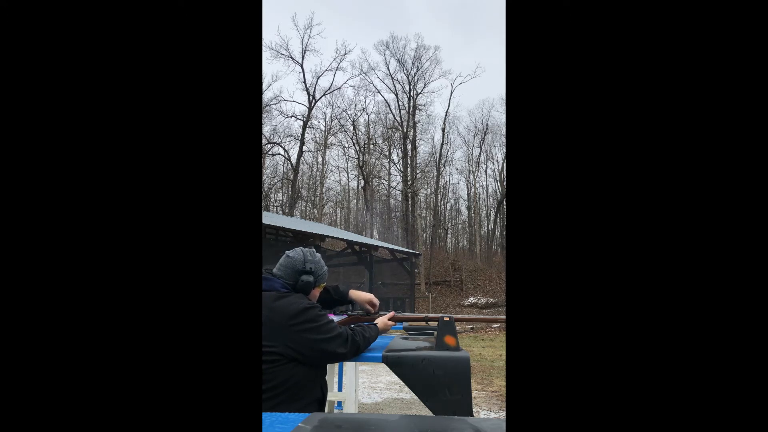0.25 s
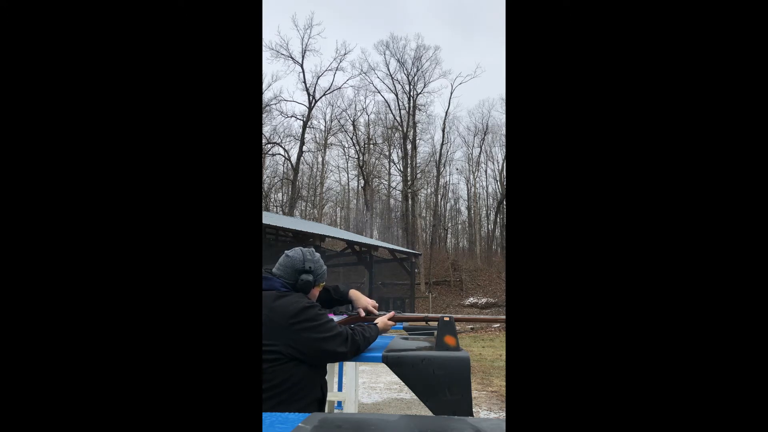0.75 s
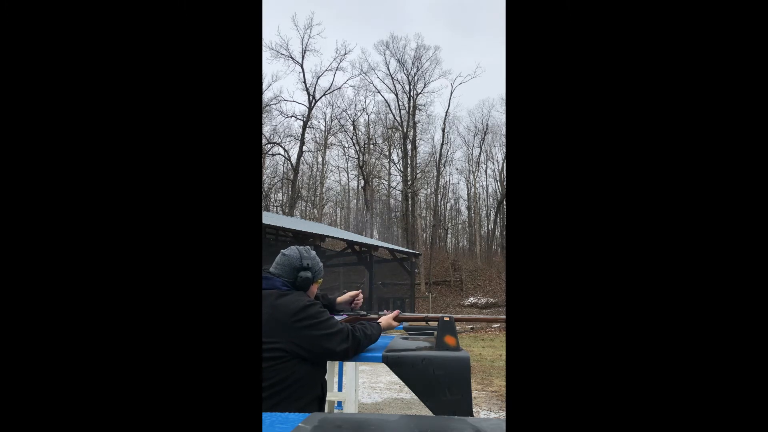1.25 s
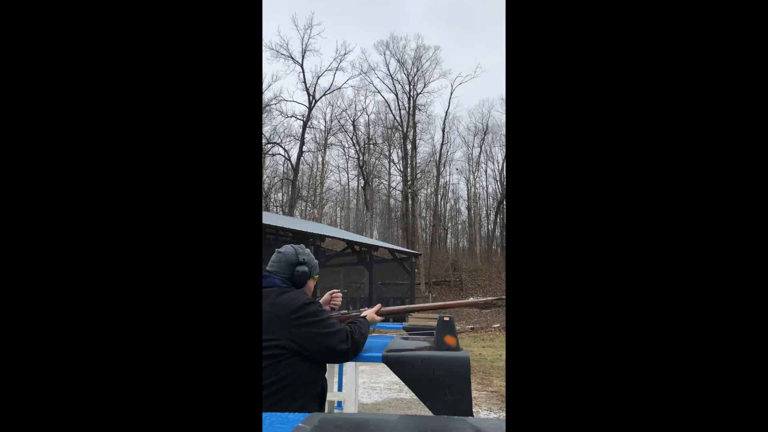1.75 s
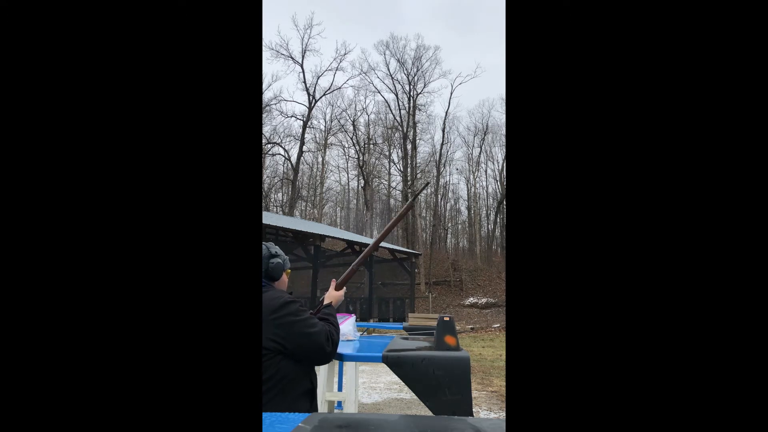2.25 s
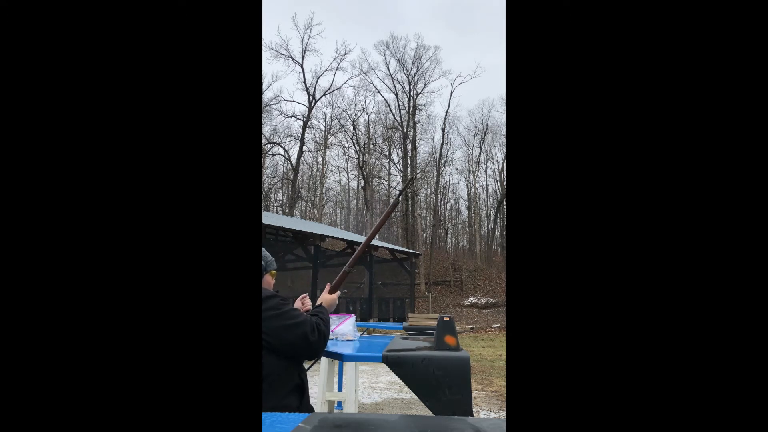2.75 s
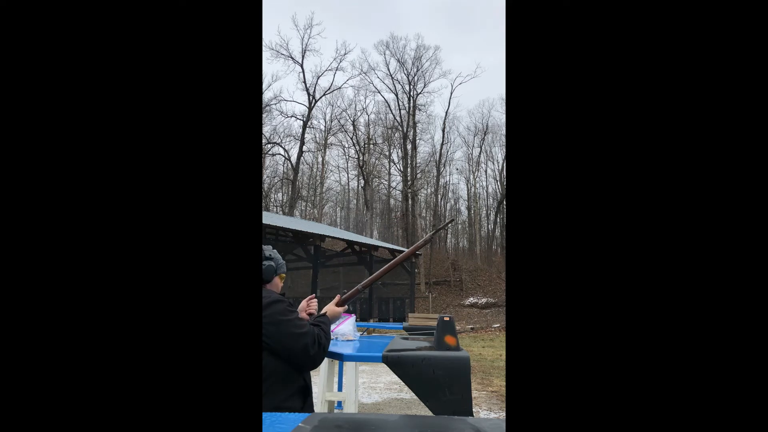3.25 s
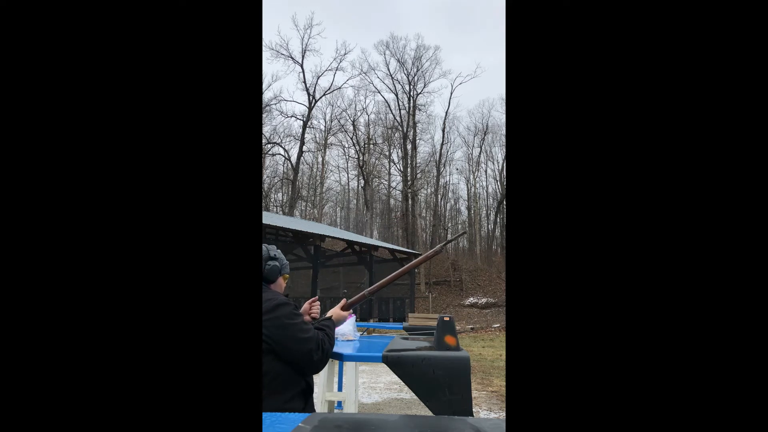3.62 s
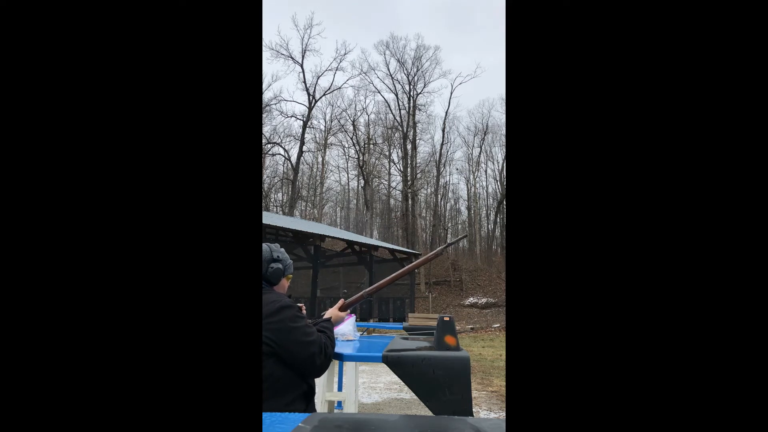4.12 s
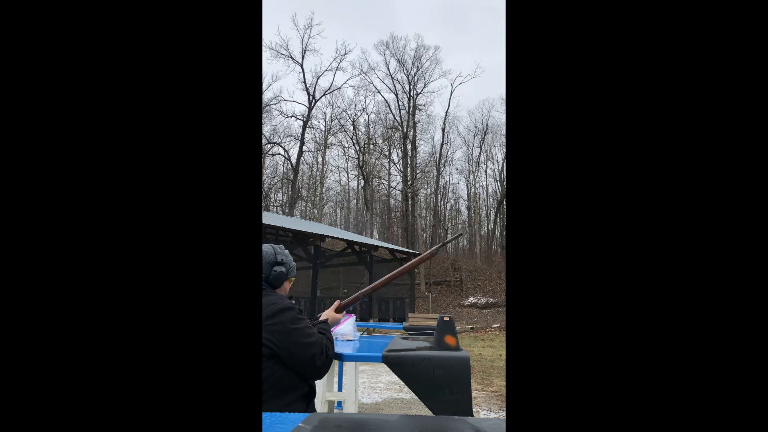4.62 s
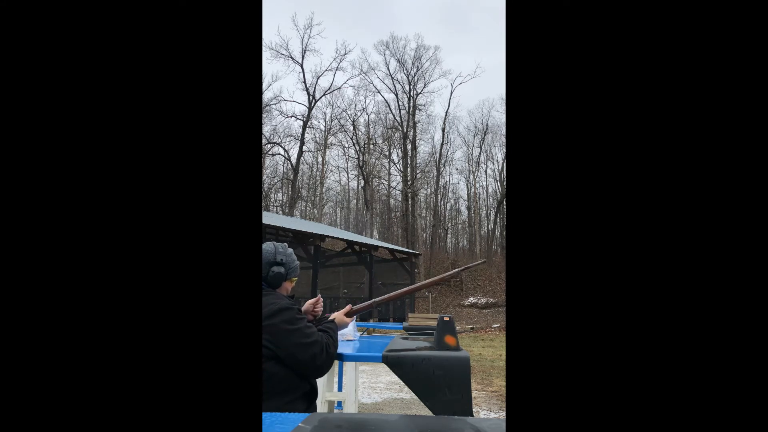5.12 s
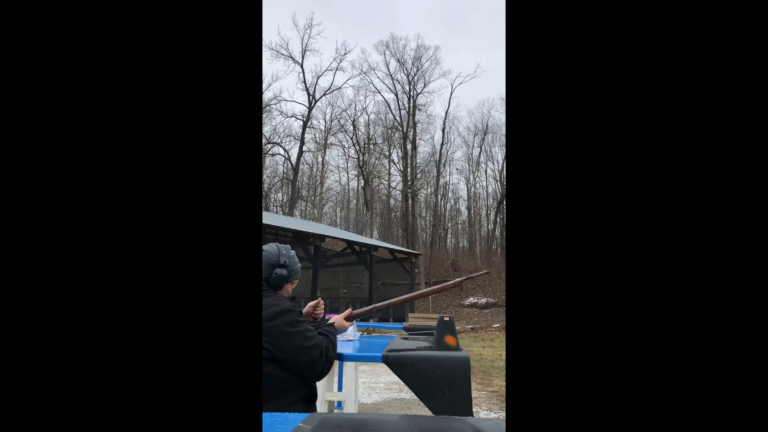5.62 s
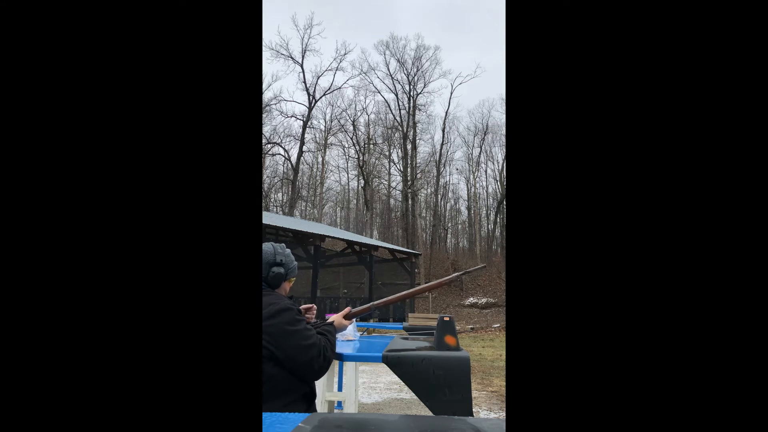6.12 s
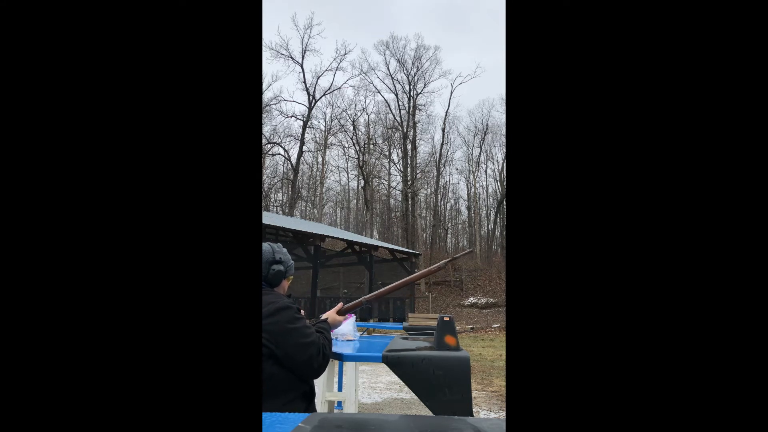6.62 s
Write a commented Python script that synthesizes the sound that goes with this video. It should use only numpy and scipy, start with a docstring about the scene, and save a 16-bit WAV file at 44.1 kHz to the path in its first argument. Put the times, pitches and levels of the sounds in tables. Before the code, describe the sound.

A person in a jacket handles an old rifle at a bench in the open. Sleeves rustle, then a single blunt bang clatters and rings briefly, with light thuds as the rest settles. Bright, dry metal snaps and short gritty slides follow at intervals, some paired with woody knocks. A far drone swells and sinks behind the soft rumble; woods answer faintly. Plain small microphone.

```python
"""An old rifle at a bench on an outdoor range, over a low, distant rumble and a hiss of air that slowly ease off.
First come small crackles of cloth and brushing sleeves; then one dull, shot-like bang of three close blows,
made of noise puffs and damped modes, sets the bench and its metal ringing, and two knocks of the rest follow.
Then the rifle is lifted and its action worked: noise and modes make sharp steel clicks, gritty noise the slides.
Shelter and woods answer faintly in dying noise, a far drone swells once, and a small microphone hears it all."""
import sys
import numpy as np
from scipy import signal
from scipy.fft import rfft, irfft, next_fast_len
from scipy.io import wavfile
from scipy.ndimage import uniform_filter1d, map_coordinates

SR = 44100
rng = np.random.default_rng(int(sys.argv[2]) if len(sys.argv) > 2 else 0)


def persist_wave(psi):
    """Save psi, clipped to +-1, as 16-bit WAV."""
    counts = np.round(np.clip(psi, -1, 1) * 32767).astype(np.int16)
    wavfile.write(sys.argv[1], SR, np.atleast_2d(counts).T)


N = 302967

# The blows of the bang. Each row: start in seconds, then push on the bench, crack and metal ring in dB.
BANG_BLOWS = [(1.5005, -50, -29, -29.5), (1.5057, -19, -17, -32.5), (1.5136, -21.5, -39, -28.5)]
# The hollow bench top. Each row: mode in Hz, level in dB, t60 (time to fall 60 dB) in seconds.
BENCH_MODES = [(124.3, -6, 0.04), (173.6, 0, 0.071), (198.5, -0.5, 0.099), (307.3, -6, 0.27),
               (342, -3.5, 0.11), (389.3, 1, 0.063), (441, -2.5, 0.077)]
# Metal parts of the rest and bench. Each row: mode in Hz, level in dB, t60 in seconds.
METAL_MODES = [(386, 0, .25), (497, -3, .42), (598, 1, .21), (662, -4, .17), (899, -13, .25),
               (992, -5, .27), (1155, -2, .18), (1210, -8, .25), (1455, -5, .19), (1630, -1, .16),
               (1856, -6, .22), (1988, 0, .2), (2030, -5, .24), (2143, -12, .3), (2681, -9, .19),
               (2821, -11, .27), (3120, -7, .17), (5530, -17, .24)]
# Dense metallic ringing, its starting colour. Each row: frequency in Hz, level in dB.
CLATTER_COLOUR = [(100, 8), (300, 9.5), (750, 3.5), (1100, 1.5), (2000, 8.5), (2300, -1.5), (3200, -7.5),
                  (4000, -14), (6000, -16), (8500, -25.5), (11000, -30), (16000, -36)]
# How long that ringing lasts. Each row: frequency in Hz, t60 in seconds.
CLATTER_DECAY = [(100, 0.3), (500, 0.29), (2000, 0.24), (6000, 0.42), (14000, 0.26)]
# Colour of the crack. Each row: frequency in Hz, level in dB.
CRACK_COLOUR = [(200, 3.5), (800, 7), (2000, 0.5), (4000, -5), (8000, -7.5), (15000, -22)]


def bang(crack_t60=0.01, clatter_db=-2.5, metal_db=-10):
    """Each blow cracks, pushes the hollow bench top and leaves its metal ringing."""
    out, t = np.zeros(N), np.arange(SR // 2) / SR
    for s, push_db, crack_db, ring_db in BANG_BLOWS:
        push = ring(BENCH_MODES, t)
        crack = burst(lambda hz: amp(along(CRACK_COLOUR, hz)), t, crack_t60)
        clatter = noise(lambda hz: amp(along(CLATTER_COLOUR, hz)), size=len(t))
        clatter = dying(clatter, CLATTER_DECAY)
        metal = amp(metal_db) * ring(METAL_MODES, t) + amp(clatter_db) * clatter
        add(out, s, amp(push_db) * push + amp(crack_db) * crack + amp(ring_db) * metal)
    return out


# The rest settling back on the bench. Each row: start in seconds, then thud, tap and tick in dB.
REST_KNOCKS = [(1.6949, -60, -37.5, -51.5), (1.6979, -35, -48, -59.5), (1.76, -42, -57, -44),
               (1.7642, -36, -45, -73)]
# The body of the rest. Each row: mode in Hz, level in dB, t60 in seconds.
REST_MODES = [(127, -3.5, 0.15), (235, -13.5, 0.63), (275.5, -2, 0.12), (341.7, -1, 0.093),
              (417, 1.5, 0.025)]
# Colour of its tap. Each row: frequency in Hz, level in dB.
TAP_COLOUR = [(200, -6.5), (600, -9), (1200, -1.5), (1700, -14), (3000, -30.5), (10000, -37.5)]


def knocks(tap_t60=0.049, tick_t60=0.0093):
    """The rest settles: its modes thud, a coloured noise puff taps and a white one ticks."""
    out, t = np.zeros(N), np.arange(SR // 2) / SR
    for s, thud_db, tap_db, tick_db in REST_KNOCKS:
        thud = ring(REST_MODES, t)
        tap = burst(lambda hz: amp(along(TAP_COLOUR, hz)), t, tap_t60)
        tick = rng.standard_normal(len(t)) * fade(t, tick_t60)
        add(out, s, amp(thud_db) * thud + amp(tap_db) * tap + amp(tick_db) * tick)
    return out


# Parts of the action that meet their catch, then snap home. Each row: start in seconds, meeting in dB,
# travel in seconds, snap in dB, treble tilt in dB per octave, stock in dB,
# centre of the stock's knock in Hz, low thud in dB.
ACTION_LATCHES = [(2.7587, -26.5, .0044, -16, 5, -35.5, 1600, -39.5),
                  (3.763, -33, .0052, -44, 2.5, -43, 1600, -82),
                  (4.2613, -56.5, .0077, -63, -4, -54.5, 1500, -73.5),
                  (4.7685, -17, .0043, -12.5, 4, -32, 1800, -41),
                  (6.1194, -39.5, .0059, -29, -3.5, -39, 1080, -75),
                  (6.3901, -46, .0068, -52, -5.5, -48, 1700, -76.5)]
# Single contacts; the first five rows are crackles of cloth. Each row: start in seconds, steel modes in dB,
# treble tilt in dB per octave, stock modes in dB, centre of the stock's knock in Hz.
SINGLE_CONTACTS = [(.0604, -44.5, -3, -68, 1980), (.0843, -43.5, 0, -78, 2400),
                   (.174, -59, 21.5, -59.5, 1770), (.517, -52, 7, -61.5, 1620),
                   (.538, -51, 12, -59.5, 1540), (1.9114, -38, 0, -37.5, 2200),
                   (2.7049, -58, -5, -44.5, 1540), (2.732, -59.5, -4.5, -49, 1442),
                   (2.8119, -48, 2, -59, 1825), (3.7285, -75, -9.5, -55.5, 1490),
                   (3.967, -60.5, -12, -59, 2400), (3.991, -61, -12, -65.5, 2620),
                   (4.7203, -28, -3.5, -35.5, 1400), (4.7347, -27, -1.5, -34.5, 1500),
                   (4.753, -39.5, -1.5, -44.5, 1200), (4.8455, -42, -2, -52.5, 1190),
                   (4.8674, -51.5, -5, -45, 1540), (6.1334, -39.5, -4.5, -40.5, 920),
                   (6.2583, -63.5, 7.5, -61.5, 1587), (6.7088, -45.5, 4.5, -45, 900)]
# the first touch against the snap: dB per octave, dB in the stock
MEETING_TILT_DB, MEETING_STOCK_DB = -7.5, -1.5
RATTLE_S, RATTLE_SCATTER_S = .012, .001  # mean time between rebounds, random spread of each
# first rebound against the snap, loss at each further one; in steel, then in the stock
RATTLE_STEEL_DB, RATTLE_STEEL_LOSS_DB = -21, 12
RATTLE_STOCK_DB, RATTLE_STOCK_LOSS_DB, RATTLE_HZ = -10, 5.5, 884  # last: centre of its knock
THUD_HZ = 330  # centre of the low knock when a snap jolts the whole stock


def action(count=4):
    """Each latch meets its catch, snaps home, jolts the stock and rattles to rest; single contacts and
    the early crackles of cloth are one short contact sound each."""
    out = np.zeros(N)
    for s, meeting_db, travel, snap_db, tilt_db, stock_db, centre_hz, thud_db in ACTION_LATCHES:
        home = s + travel
        meeting = contact(meeting_db, tilt_db + MEETING_TILT_DB, stock_db + MEETING_STOCK_DB, centre_hz)
        add(out, s, meeting)
        snap = contact(snap_db, tilt_db, stock_db, centre_hz)
        add(out, home, snap + amp(thud_db) * stock_knock(THUD_HZ))
        for k in range(count):
            steel_db = snap_db + RATTLE_STEEL_DB - k * RATTLE_STEEL_LOSS_DB
            wood_db = stock_db + RATTLE_STOCK_DB - k * RATTLE_STOCK_LOSS_DB
            rebound = contact(steel_db, tilt_db, wood_db, RATTLE_HZ)
            add(out, home + (k + 1) * RATTLE_S + RATTLE_SCATTER_S * rng.standard_normal(), rebound)
    for s, steel_db, tilt_db, stock_db, centre_hz in SINGLE_CONTACTS:
        add(out, s, contact(steel_db, tilt_db, stock_db, centre_hz))
    return out


# The steel receiver. Each row: resonance in Hz, width in Hz, level in dB.
STEEL_MODES = [(2460, 260, -7.5), (3160, 260, -4), (3806, 190, -1), (4756, 190, -1), (5720, 380, -2.5),
               (6370, 160, -6.5), (6700, 150, 0.5), (7900, 600, -4), (9220, 220, -7.5), (11400, 600, -23.5),
               (13700, 1900, -24.5)]


def contact(steel_db, tilt_db, stock_db, centre_hz, snap_t60=0.018, ring_t60=0.033, ring_db=-17, rise=0.00028):
    """Steel parts snap together; the hand damps the receiver, the stock knocks a little longer."""
    t = np.arange(SR // 7) / SR
    # each contact has its own brightness; the tilt turns about 5500 Hz
    brightness = lambda hz: amp(tilt_db * np.log2((hz + 500) / 6000))
    steel = burst(lambda hz: resonances(STEEL_MODES, hz) * brightness(hz), t, snap_t60)
    steel += amp(ring_db) * ring([(hz, db, ring_t60) for hz, width, db in STEEL_MODES], t)
    both = amp(steel_db) * steel + amp(stock_db) * stock_knock(centre_hz)
    return both * (1 - np.exp(-t / rise))


# Wood and barrel. Each row: resonance in Hz, width in Hz, level in dB.
STOCK_MODES = [(313.7, 64, 1.5), (577, 170, -3.5), (776, 120, -4), (905, 24, -7), (1207, 200, 1),
               (1408, 66, 1), (1547, 80, 4.5), (1780, 230, -1), (2020, 120, 5), (2306, 360, 2),
               (2755, 230, -9.5)]


def stock_knock(centre_hz, stock_t60=.045, wood_db=-7, wood_t60=0.054, focus_db=7):
    """The point of contact picks out some of the stock's modes; lower ones ring longer."""
    t = np.arange(SR // 7) / SR
    # modes lose focus_db per octave away from the centre
    place_db = lambda hz: -focus_db * np.abs(np.log2((hz + 1) / centre_hz))
    stock = burst(lambda hz: resonances(STOCK_MODES, hz) * amp(place_db(hz)), t, stock_t60)
    # wood_t60 holds at 1500 Hz
    modes = [(hz, db + place_db(hz), wood_t60 * np.sqrt(1500 / hz)) for hz, width, db in STOCK_MODES]
    return stock + amp(wood_db) * ring(modes, t)


# Longer slides, steel on steel. Each row: middle in seconds, spread of the bell in seconds, level in dB.
LONG_SLIDES = [(2.738, 0.026, -51.5), (3.765, 0.014, -64.5), (4.762, .015, -50.5), (5.095, 0.018, -64),
               (6.15, 0.028, -56.5)]
# a faint puff of noise swells up just ahead of each contact: lead, spread of the bell, level against
# the contact's stock level
LEAD_IN_S, LEAD_IN_HALF_S, LEAD_IN_DB = 0.0061, 0.0044, -18.5


def slides(steel_db=-8, grain_db=4, catch_db=3):
    """Sliding parts catch and slip, stirring the same resonances; a faint puff swells ahead of each contact."""
    contacts_db = [(s, stock_db) for s, _, _, _, _, stock_db, _, _ in ACTION_LATCHES]
    contacts_db += [(s, stock_db) for s, _, _, stock_db, _ in SINGLE_CONTACTS]
    lead_ins = [(s - LEAD_IN_S, LEAD_IN_HALF_S, db + LEAD_IN_DB) for s, db in contacts_db]
    grit = rng.standard_normal(N) * amp(grain_db * wobble(900) + catch_db * wobble(90))
    body = lambda hz: resonances(STOCK_MODES, hz) + amp(steel_db) * resonances(STEEL_MODES, hz)
    return swells(LONG_SLIDES + lead_ins) * unit(filtered(grit, body))


# Sleeves brushing. Each row: middle in seconds, spread of the bell in seconds, level in dB,
# treble tilt in dB per octave.
SLEEVE_BRUSHES = [(0.087, 0.028, -55, -2), (0.181, 0.019, -61.5, 7), (.56, 0.026, -65, 0.5),
                  (1.124, 0.091, -70, -6), (2.099, 0.4, -74.5, -4.5), (4.07, .036, -70.5, -7.5),
                  (5.104, .04, -73.5, -4)]
# Colour of the cloth before the tilt. Each row: frequency in Hz, level in dB.
CLOTH_COLOUR = [(500, -23.5), (1200, -11), (2200, -5), (3300, -5.5), (5000, -2.5), (7500, -0.5),
                (10000, -2), (16000, -12)]


def sleeves(grain_db=2.5, crease_db=2):
    """Jacket cloth brushes in uneven strokes of noise, some brighter than others."""
    grain = unit(amp(grain_db * wobble(120) + crease_db * wobble(700)))
    out = np.zeros(N)
    for s, half, db, tilt_db in SLEEVE_BRUSHES:
        stroke = swells([(s, half, db)])
        near = np.flatnonzero(stroke)
        colour = lambda hz: amp(along(CLOTH_COLOUR, hz) + tilt_db * np.log2((hz + 500) / 6000))
        out[near] += stroke[near] * noise(colour, size=len(near))
    return grain * out


# What the trees send back. Each row: frequency in Hz, level in dB.
SCATTER_COLOUR = [(200, -14.5), (700, 6), (1800, 4.5), (3500, 0.5), (6000, -1), (9300, -8), (11000, -13),
                  (16000, -22)]
# How long the woods answer. Each row: frequency in Hz, t60 in seconds.
WOODS_DECAY = [(200, 0.89), (1500, 1.0), (5000, 1), (9000, 1), (15000, 0.52)]


def woods(x, level_db, patchy_db):
    """Many trunks scatter a click's energy into an uneven wash that has none of its resonances."""
    scatter = noise(lambda hz: amp(along(SCATTER_COLOUR, hz)), size=N)
    hz, t, z = signal.stft(scatter, SR, nperseg=256)
    energy = np.interp(t, np.arange(N) / SR, uniform_filter1d(x ** 2, size=256))
    # the answer builds up over some 30 ms, then dies
    decay = (fade(t, along(WOODS_DECAY, hz)[:, None]) * (1 - np.exp(-t / .03))) ** 2
    answer = signal.fftconvolve(energy[None], decay / decay.sum(1).mean(), axes=1)[:, :len(t)]
    wash = np.sqrt(np.abs(answer))
    patches = uniform_filter1d(rng.standard_normal(z.shape), size=7, axis=0)
    patches = unit(uniform_filter1d(patches, size=9, axis=1))
    return signal.istft(z * wash * amp(level_db + patchy_db * patches), SR, nperseg=256)[1][:N]


def echoes(x, life, delay):
    """A diffuse answer of dying noise that builds up over the delay."""
    tail = dying(rng.standard_normal(SR), life) * (1 - np.exp(-np.arange(SR) / SR / delay))
    return signal.fftconvolve(x, tail / np.linalg.norm(tail))[:N]


# Colour of the open air. Each row: frequency in Hz, level in dB.
AIR_COLOUR = [(12, -56.5), (20, -23), (52, -4), (130, -2.5), (172, -9), (367, -16.5), (499, -21.5),
              (718, -24), (1000, -22.5), (1400, -28.5), (1810, -29), (2990, -37.5), (5680, -38.5),
              (11800, -41), (16000, -49)]
# The far drone, its gain before squaring. Each row: resonance in Hz, width in Hz, level in dB.
DRONE_MODES = [(135, 19, -0.5), (158, 23, 0), (189, 18, -1.5)]
AIR_DB, AIR_DRIFT_DB_PER_S = -61, -0.31  # the background eases off slowly
WAVER_DB = .6  # unsteadiness of the rumble
DRONE_FAR_DB, DRONE_NEAR_DB = -71.5, -61  # the drone swells once and sinks back
DRONE_START_S, DRONE_RISE_S, DRONE_HOLD_S, DRONE_FALL_S = 2.4, .38, 1.75, 1  # its swell


def outdoors(level_db=0.78, hiss_db=1):
    """Wavering distant rumble under an even hiss of air, both easing off, and a far drone."""
    t = np.arange(N) / SR
    low = lambda hz: 1 / (1 + (hz / 700) ** 4)
    air = noise(lambda hz: amp(along(AIR_COLOUR, hz)), size=N)
    rumble = filtered(air, low)
    hiss = air - rumble
    bed = amp(level_db + WAVER_DB * wobble(7.9)) * rumble + amp(hiss_db) * hiss
    drone = noise(lambda hz: resonances(DRONE_MODES, hz) ** 2, size=N)
    corners = np.cumsum([DRONE_START_S, DRONE_RISE_S, DRONE_HOLD_S, DRONE_FALL_S])
    drone_db = np.interp(t, corners, [DRONE_FAR_DB, DRONE_NEAR_DB, DRONE_NEAR_DB, DRONE_FAR_DB])
    return amp(AIR_DB + AIR_DRIFT_DB_PER_S * t) * bed + amp(drone_db) * drone


def amp(db):
    """Decibels to gain."""
    return 10 ** (np.asarray(db) / 20)


def unit(x):
    """Scale to rms 1."""
    return x / np.sqrt(np.mean(x ** 2) + 1e-20)


def along(points, hz):
    """(Hz, value) points read on a log axis."""
    f, v = np.transpose(points)
    return np.interp(np.log(hz + 1), np.log(f + 1), v)


def resonances(modes, hz):
    """Gain of a body with (Hz, width in Hz, dB) peaks, their powers summed."""
    peaks = (amp(db) * hz * w / (c * c - hz * hz + 1j * hz * w) for c, w, db in modes)
    return np.sqrt(sum(np.abs(peak) ** 2 for peak in peaks))


def noise(gain, size):
    """Noise of rms 1 coloured by a gain of frequency."""
    m = next_fast_len(size)
    spectrum = rfft(rng.standard_normal(m)) * gain(np.fft.rfftfreq(m, 1 / SR))
    return unit(irfft(spectrum, m)[:size])


def filtered(x, gain):
    """Colour x by a gain of frequency."""
    m = next_fast_len(N + SR // 2)
    return irfft(rfft(x, m) * gain(np.fft.rfftfreq(m, 1 / SR)), m)[..., :N]


def fade(t, t60):
    """Free decay, down 60 dB after t60 seconds."""
    return np.exp(-np.log(1000) * t / t60)


def burst(gain, t, t60):
    """A dying puff of coloured noise with the same energy at every blow."""
    envelope = fade(t, t60)
    puff = noise(gain, size=len(t)) * envelope
    return puff * np.linalg.norm(envelope) / np.linalg.norm(puff)


def dying(x, life):
    """Let each frequency of x die at its own speed."""
    hz, t, z = signal.stft(x, SR, nperseg=256)
    return signal.istft(z * fade(t, along(life, hz)[:, None]), SR, nperseg=256)[1][:len(x)]


def ring(modes, t):
    """Damped modes, neighbours in opposite phase, a random decibel or so stronger or weaker at every blow."""
    out = np.zeros(len(t))
    for k, (hz, db, t60) in enumerate(modes):
        level = (-1) ** k * amp(db + rng.standard_normal())
        out += level * fade(t, t60) * np.sin(2 * np.pi * hz * t)
    return out


def wobble(rate):
    """A smooth random curve, rate knots a second."""
    knots = rng.standard_normal(int(N * rate / SR) + 4)
    return map_coordinates(knots, [np.arange(N) * rate / SR])


def swells(rows):
    """Bell-shaped strokes as one gain curve."""
    out, t = np.zeros(N), np.arange(N) / SR
    for s, half, db in rows:
        near = slice(*np.searchsorted(t, [s - 5 * half, s + 5 * half]))
        out[near] += amp(db) * np.exp(-.5 * ((t[near] - s) / half) ** 2)
    return out


def add(track, s, sound):
    """Mix a sound into the track at time s."""
    start = round(s * SR)
    track[start:start + len(sound)] += sound[:N - start]


def scene(shelter_db=-22, bang_echo_db=-27):
    """The handling is answered by the shelter and, later, by the woods; the bang by the woods alone."""
    rifle = action() + slides()
    # the blows and knocks carry no deep bass
    bass_cut = signal.butter(3, 80, "high", fs=SR, output="sos")
    blows = signal.sosfilt(bass_cut, bang() + knocks())
    shelter_life = [(300, .25), (2000, 0.06), (12000, .1)]  # Hz, t60 in seconds
    shelter = amp(shelter_db) * echoes(rifle, shelter_life, delay=0.014)
    far = woods(rifle, level_db=-30, patchy_db=3.5)
    far += amp(bang_echo_db) * echoes(blows, WOODS_DECAY, delay=0.15)
    return (rifle + blows + shelter + far + sleeves() + outdoors())[None]


def record(dry, low_cut_hz=37, top_hz=16200):
    """The small microphone loses the deepest bass and keeps nothing above its band limit."""
    dry = signal.sosfilt(signal.butter(2, low_cut_hz, "high", fs=SR, output="sos"), dry)
    return filtered(dry, lambda hz: hz < top_hz)


dry = scene()
out = record(dry)
persist_wave(out)
```